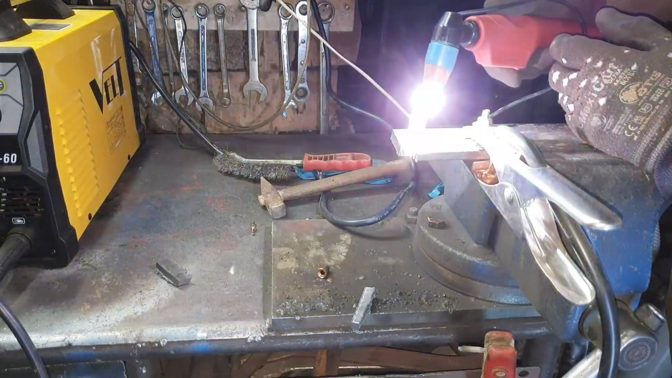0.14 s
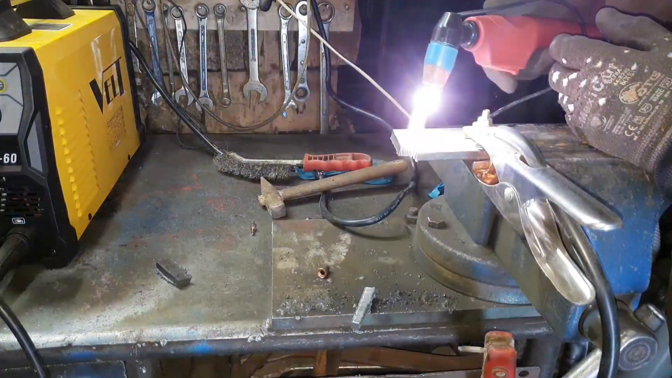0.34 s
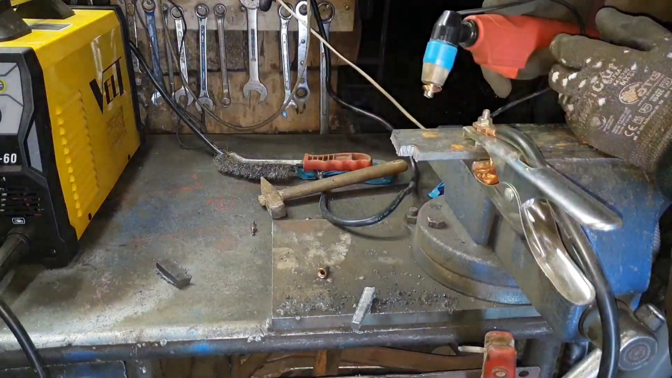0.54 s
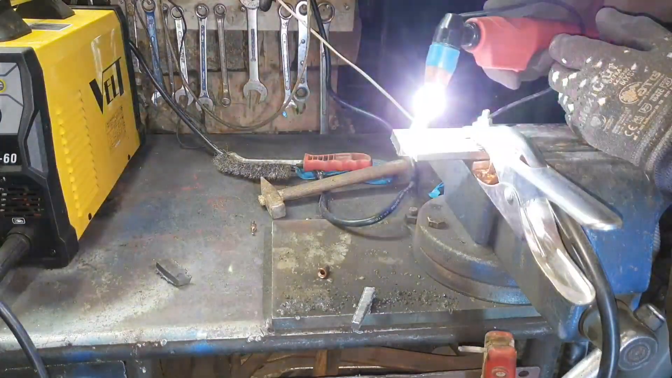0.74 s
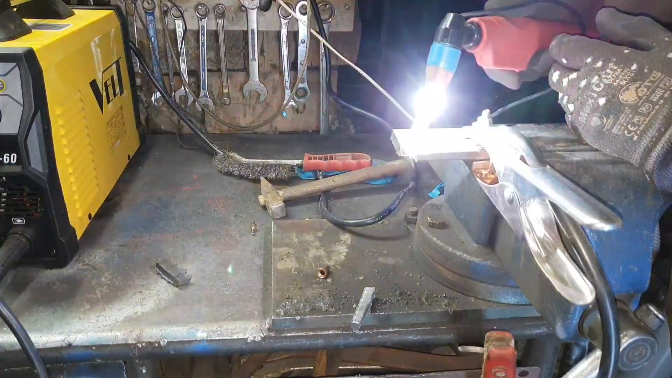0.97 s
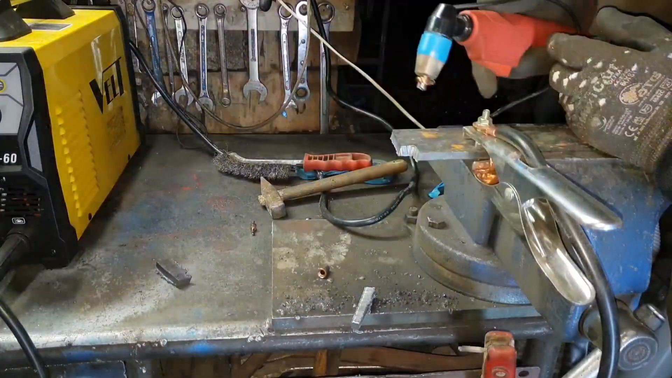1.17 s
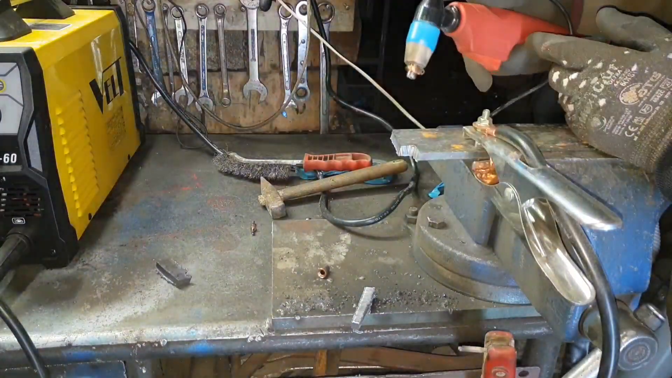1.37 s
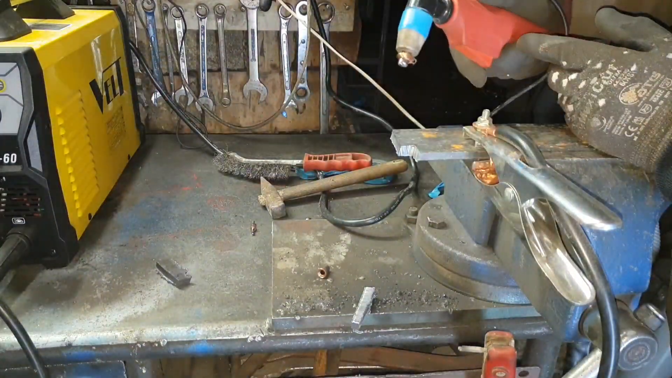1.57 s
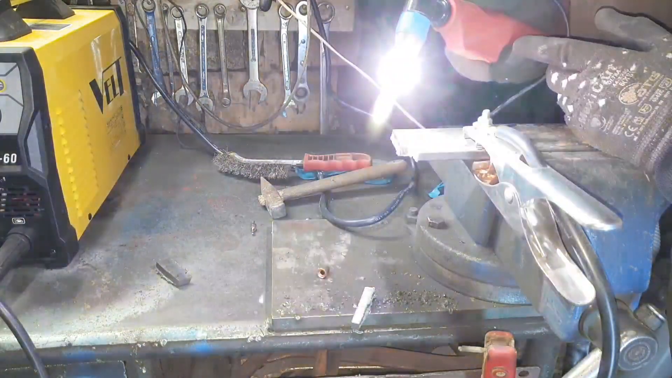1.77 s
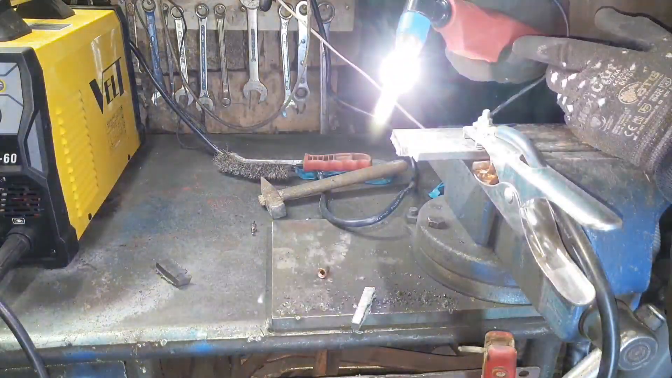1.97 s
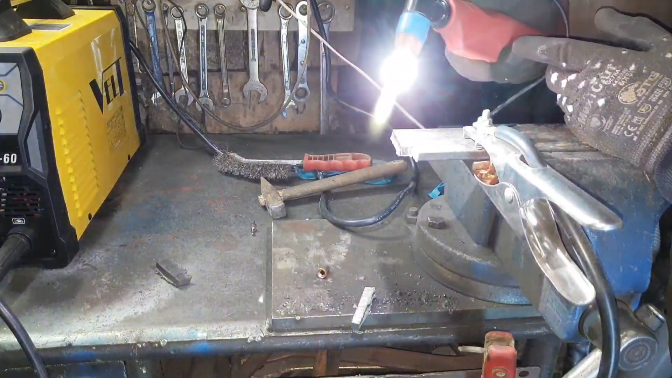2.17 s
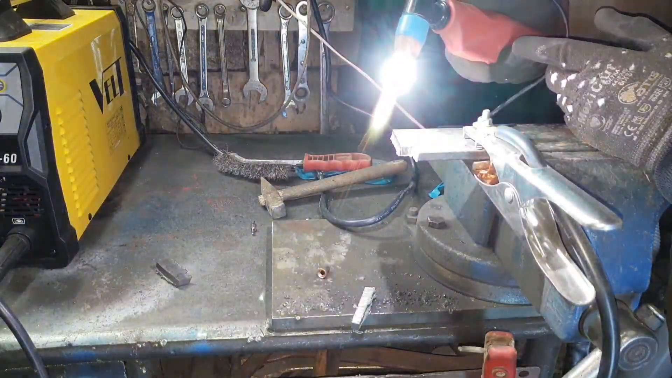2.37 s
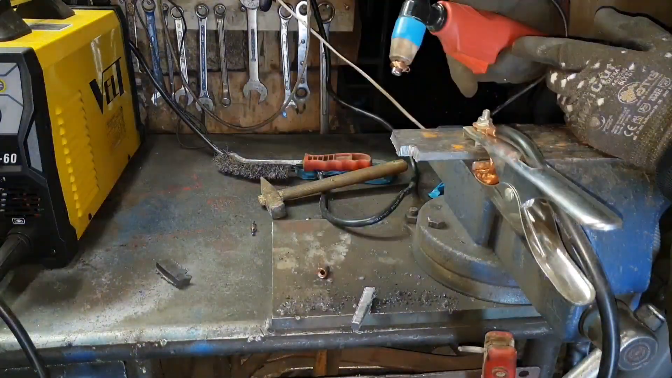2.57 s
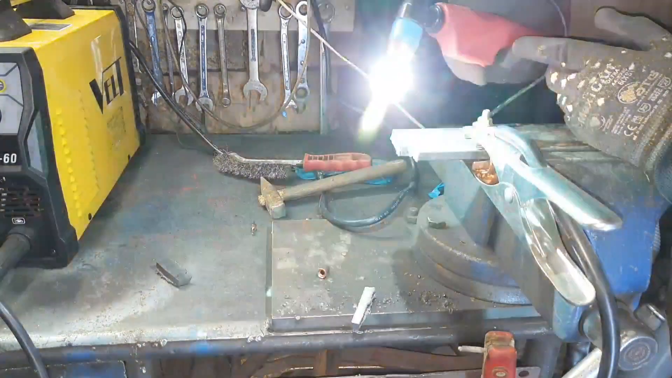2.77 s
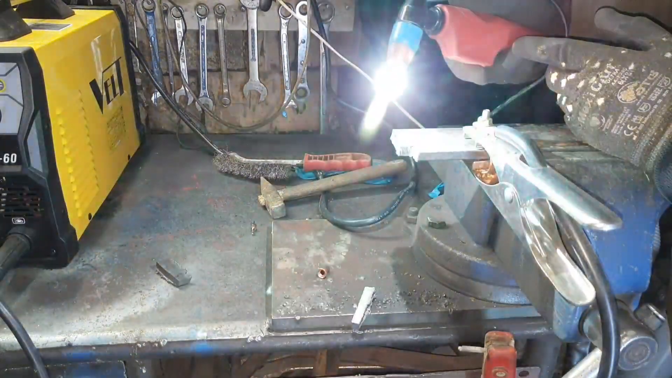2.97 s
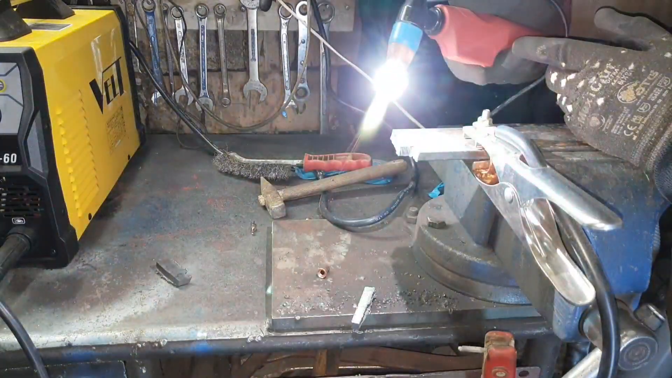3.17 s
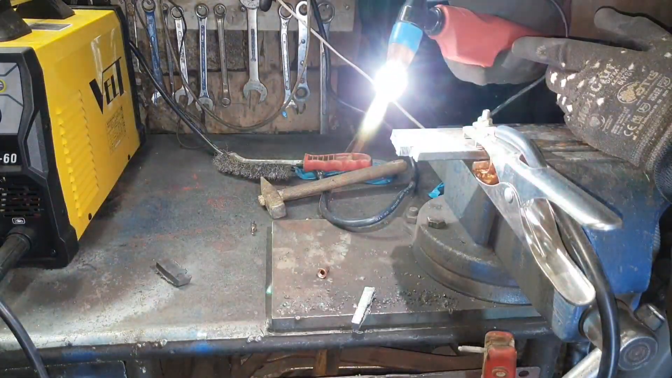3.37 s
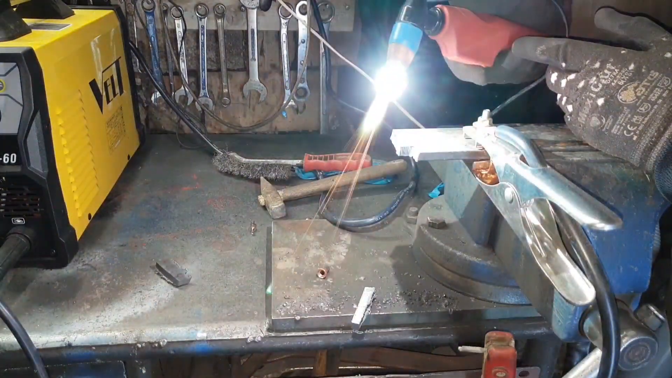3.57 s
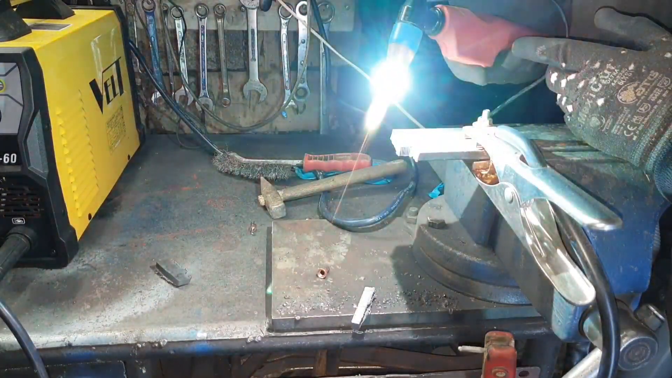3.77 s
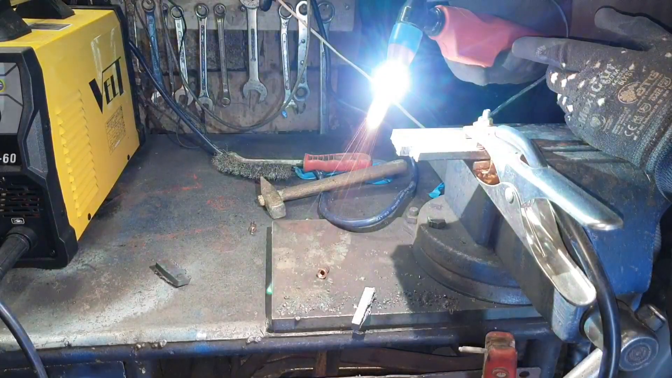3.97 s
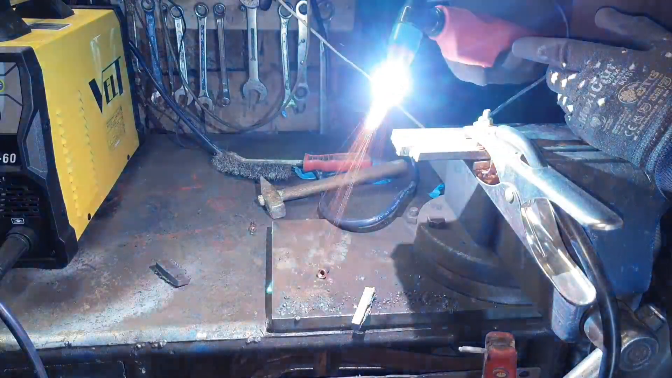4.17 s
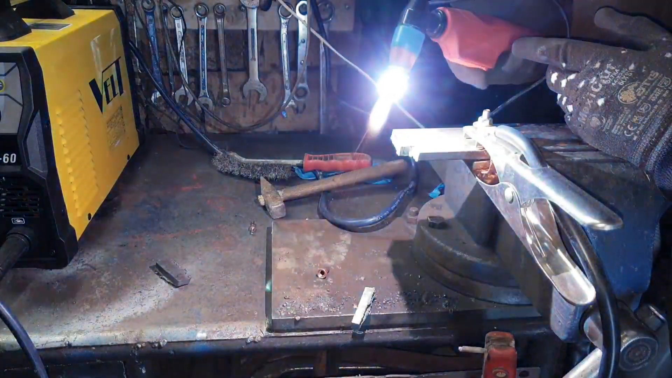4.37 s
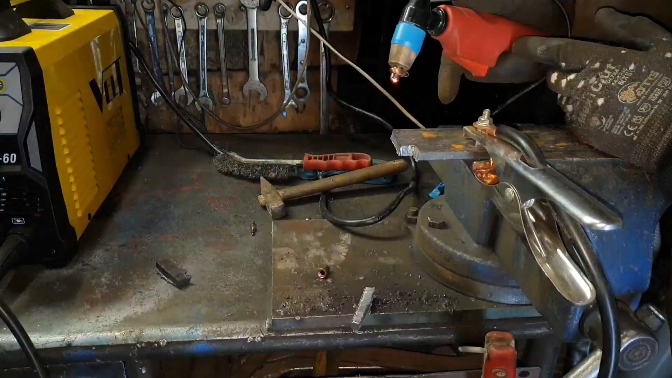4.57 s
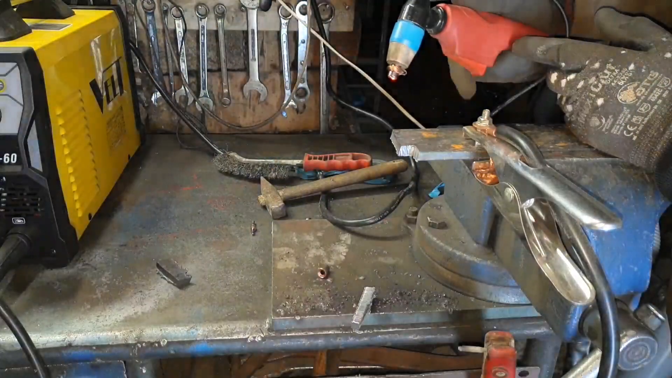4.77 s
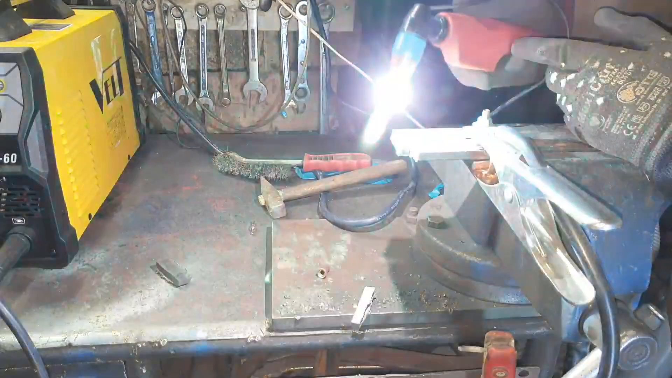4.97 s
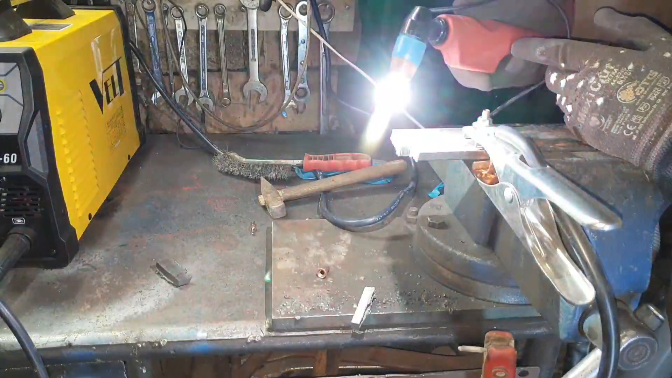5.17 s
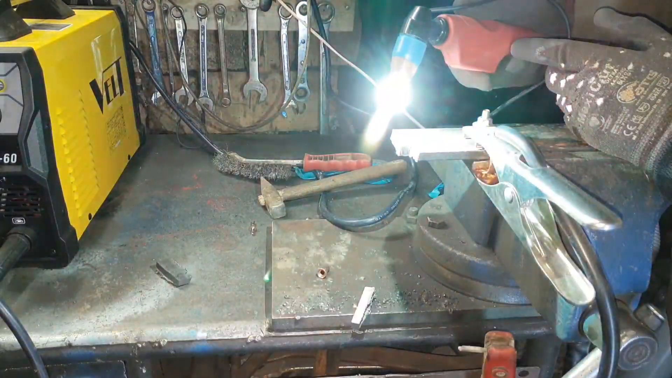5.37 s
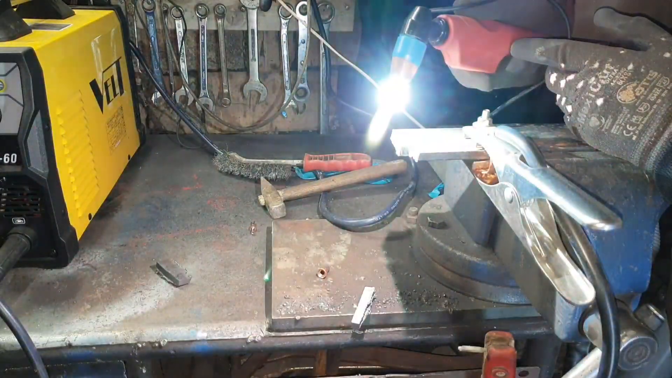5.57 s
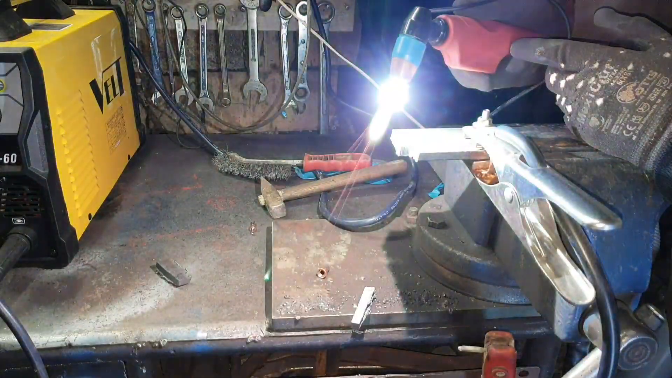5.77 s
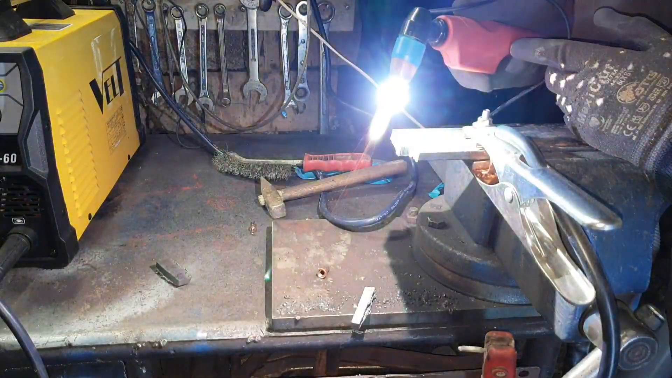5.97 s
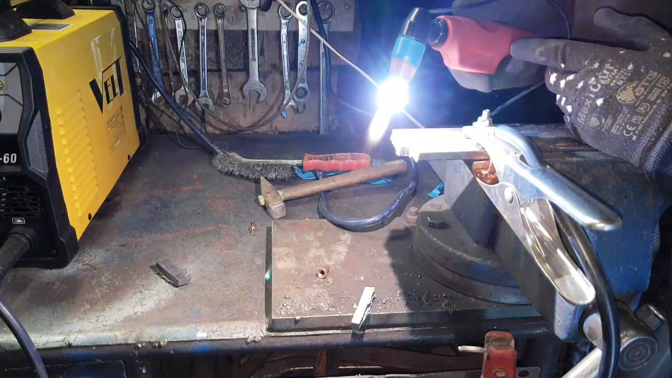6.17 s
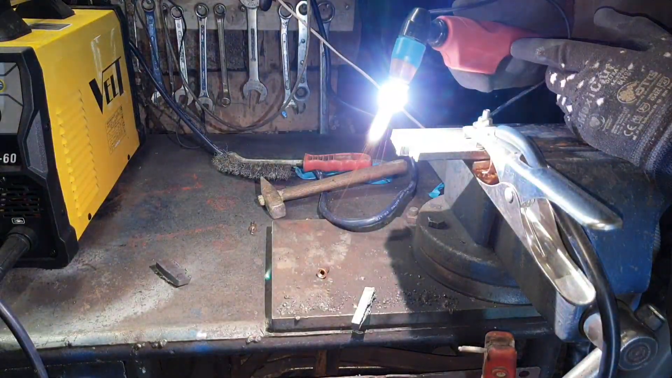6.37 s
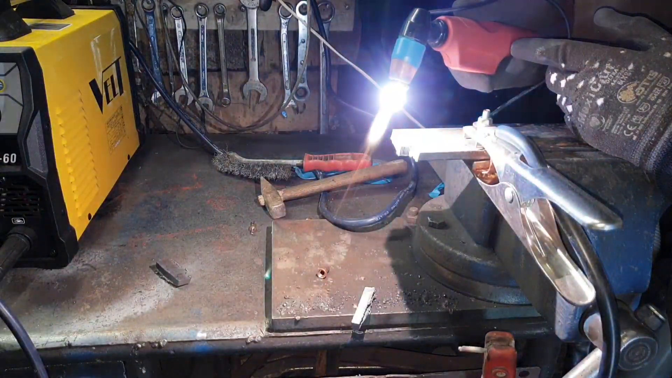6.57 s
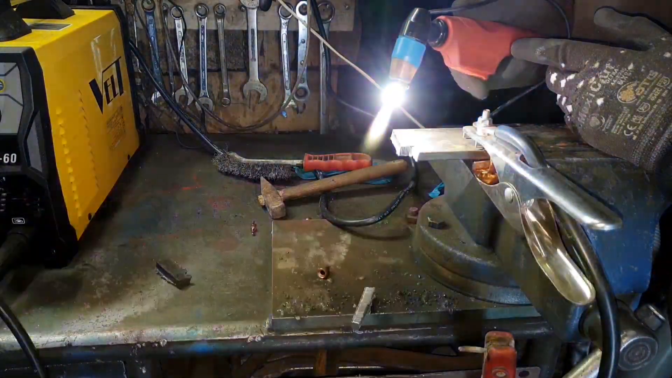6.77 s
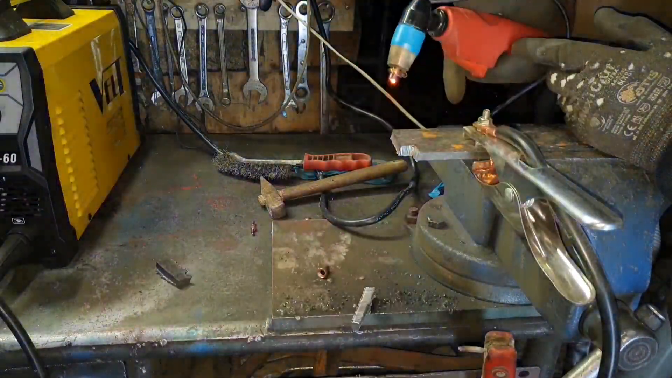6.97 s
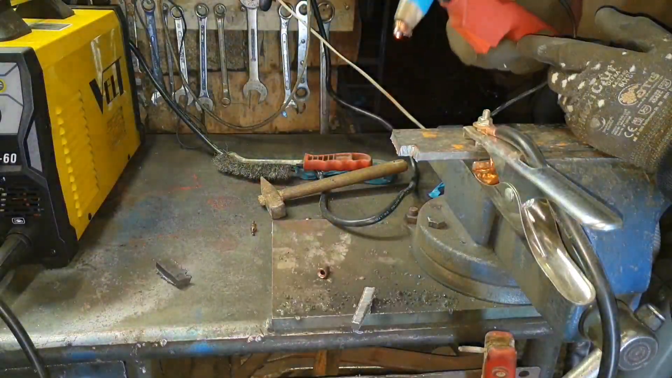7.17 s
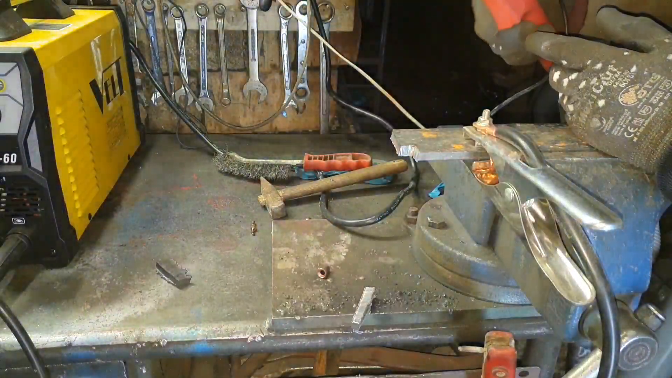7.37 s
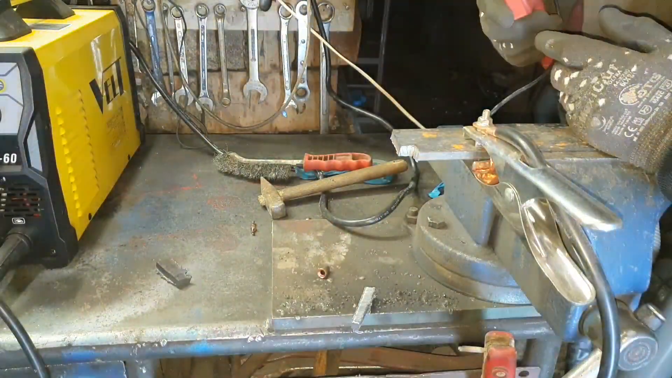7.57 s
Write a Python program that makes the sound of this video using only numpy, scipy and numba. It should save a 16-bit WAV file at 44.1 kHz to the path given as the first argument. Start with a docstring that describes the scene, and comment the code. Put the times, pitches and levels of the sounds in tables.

```python
"""Plasma torch over a steel bench

A plasma torch burns five times in the air and misfires once, an arm's length from a phone.
Compressed air hisses from the nozzle throughout; the arc strikes with a bang, roars, howls and sizzles
over the hiss, and dies with a sucking pop. Vice and plate ring along with it. Bench, vice and tool wall
throw close echoes, and the power source's fan hums underneath."""
import sys
import numpy as np
from scipy import signal
from scipy.fft import rfft, irfft, next_fast_len
from scipy.io import wavfile
from scipy.ndimage import uniform_filter1d, map_coordinates
from numba import njit

SR = 44100
rng = np.random.default_rng(int(sys.argv[2]) if len(sys.argv) > 2 else 0)


def unload_audio(sound):
    """Save the sound as a 16-bit wav file, at the path given as the first command line argument."""
    columns = np.transpose(np.atleast_2d(sound))
    # keep every value between -1 and 1, then stretch to whole-number steps
    steps = np.round(np.clip(columns, -1, 1) * 32767)
    wavfile.write(sys.argv[1], SR, steps.astype(np.int16))


N = 336483
TIME = np.arange(N) / SR
LEAD = 40  # samples a transient starts ahead of its cue
TRANSIENT_MS = np.arange(-LEAD, 1200) * 1000 / SR
TOP_SPLIT_HZ = 10200  # where the bright half of hiss and sizzle begins


def undb(db):
    """Decibels to gain."""
    return 10 ** (np.asarray(db) / 20)


def unit(x):
    """Each channel scaled to rms 1."""
    return x / np.sqrt(np.mean(x ** 2, axis=-1, keepdims=True))


def noise(colour, lo_hz, hi_hz, wide):
    """Stereo noise of rms 1, band edges faded over half an octave; wide is side over mid."""
    size = next_fast_len(N)
    octave = np.log2(np.arange(1, size // 2 + 2) * SR / size)
    hz, db = np.transpose(colour)
    low_cut = np.clip(2 * (octave - np.log2(lo_hz)) + .5, 0, 1)
    high_cut = np.clip(2 * (np.log2(hi_hz) - octave) + .5, 0, 1)
    gain = undb(np.interp(octave, np.log2(hz), db)) * np.sqrt(low_cut * high_cut)
    mid, side = irfft(rfft(rng.standard_normal((2, size))) * gain, size)[:, :N]
    return unit(np.array([mid + wide * side, mid - wide * side]))


@njit
def swept_band(x, hz, width_hz):
    """State-variable band-pass with moving centre and width, gain 1 at the centre."""
    y, band_state, low_state = np.empty(len(x)), 0., 0.
    for i in range(len(x)):
        g, damping = np.tan(np.pi * hz[i] / SR), width_hz[i] / hz[i]
        band = (band_state + g * (x[i] - low_state)) / (1 + g * (g + damping))
        band_state, low_state = 2 * band - band_state, low_state + 2 * g * band
        y[i] = damping * band
    return y


def steady_band(x, hz, width_hz):
    """The band-pass held at one pitch."""
    return swept_band(x, np.full(N, float(hz)), np.full(N, float(width_hz)))


def brighten(x, db, split_hz):
    """High shelf whose gain rides a dB curve."""
    upper = signal.sosfiltfilt(signal.butter(4, split_hz, "high", fs=SR, output="sos"), x)
    return x + (undb(db) - 1) * upper


def drift(rate_hz):
    """Smooth random modulator with a spread near 1."""
    hold = int(SR / rate_hz)
    steps = np.repeat(rng.standard_normal(N // hold + 1), hold)
    return 1.07 * uniform_filter1d(uniform_filter1d(steps, hold), hold)[:N]


def pulse(at_ms, width_ms):
    """A bell-shaped pressure pulse."""
    return np.exp(-.5 * ((TRANSIENT_MS - at_ms) / width_ms) ** 2)


def burn_times():
    """Starts and ends [s]: the first burn is already alight, the rest catch from their last strike."""
    catches = [-1] + [s + CATCH_S for s, *_ in STRIKE_CUES]
    ends = [s for s, *_ in BURN_CUES]
    starts = [max(s for s in catches if s < end) for end in ends]
    return np.array(starts), np.array(ends)


def pause_glides():
    """Seven automation curves that glide through each pause, then on to the next pause's start values."""
    starts, ends = burn_times()
    edges_s = np.column_stack([ends, np.append(starts[1:], N / SR)]).ravel()
    pairs = np.reshape(PAUSE_MIX, (len(PAUSE_MIX), -1, 2))
    return [np.interp(TIME, edges_s, pairs[:, k].ravel()) for k in range(pairs.shape[1])]


# Colour of fan wash and room tone: (frequency [Hz], relative level [dB])
FAN_COLOUR = [(30, -22), (70, -17), (130, -26), (205, -9.5), (250, -15), (298, -5.5), (372, -16), (423, -5),
              (500, -12.5), (710, -10), (950, -8.5), (1500, -9.5), (2500, -13.5)]
# Fader ride of the blade tone: (time [s], level [dB])
BLADE_RIDE = [(.5, -66), (.74, -66), (1.25, -66), (1.35, -65), (1.55, -57), (1.78, -60), (2.6, -63),
              (2.85, -71), (4.62, -61), (4.8, -56.5), (4.97, -63), (6.97, -57), (7.2, -59), (7.28, -63),
              (7.46, -65), (7.63, -64)]
def fan(blade_hz=719.8):
    """The power source's fan lays a bed of air wash under a wavering blade tone."""
    wash_db = pause_glides()[-1] + 1.9 * drift(3)
    wash = undb(wash_db) * noise(FAN_COLOUR, 20, 2900, wide=0.6)
    phase = 2 * np.pi * np.cumsum(blade_hz * (1 + 0.001 * drift(6.3))) / SR
    blade_db = np.interp(TIME, *np.transpose(BLADE_RIDE)) + 1.8 * drift(25) + 2 * drift(6)
    return wash + np.sqrt(2) * undb(blade_db) * np.sin(phase)


# Slaps off bench, vice and tool wall: (delay [ms], left level [dB], right level [dB])
EARLY_ECHOES = [(.36, -36, -20), (1.1, -33, -38), (2.25, -25, -31), (4.22, -24.5, -14), (5.55, -19, -25.5),
                (6.5, -46, -27), (7.4, -24, -46), (10.5, -51, -30), (12.1, -35, -19)]
def workshop(x, tail_db=-10, t60_s=0.22, tail_top_hz=10700, left_lean_db=1.4):
    """Direct sound, close echoes and a short dull tail that shifts as the hand moves the torch."""
    ms = np.arange(int(SR / 4)) * 1000 / SR
    taps, wait, right_lag = 600, 8, 0.5  # samples; the wait leaves room for the half-sample lag
    delays = np.array([[wait], [wait + right_lag]])
    near = irfft(np.exp(-2j * np.pi * np.arange(taps // 2 + 1) / taps * delays), taps)
    for delay_ms, *db in EARLY_ECHOES:
        samples_away = abs(np.arange(taps) - wait - delay_ms * SR / 1000)
        near += undb(db)[:, None] * np.maximum(1 - samples_away / 1.5, 0)
    damping = signal.butter(1, tail_top_hz, fs=SR, output="sos")
    tails = signal.sosfilt(damping, rng.standard_normal((2, 2, len(ms))))
    envelope = undb(-60 * ms / 1000 / t60_s) * np.clip(ms / 8, 0, 1)
    tails = unit(tails * envelope) / np.sqrt(len(ms))
    turn = .8 * drift(2)
    blend = np.cos(turn), np.sin(turn)  # equal-power crossfade between two torch positions
    far = sum(signal.oaconvolve(gain * x, tail, axes=1)[:, :N] for gain, tail in zip(blend, tails))
    room = signal.oaconvolve(x, near, axes=1)[:, :N] + undb(tail_db) * far
    return room * undb([[left_lean_db / 2], [-left_lean_db / 2]])


# Colours of the jet's top hiss and lower hiss: (frequency [Hz], relative level [dB])
TOP_HISS_COLOUR = [(7000, -6.5), (8300, -15), (10200, -5), (12300, 1.5), (13600, 0), (14600, 4.5),
                   (16500, -1)]
LOWER_HISS_COLOUR = [(880, -20), (1500, -24), (1870, -18), (2400, -11), (2970, -6.5), (4050, -1),
                     (6890, -4), (8600, -11.5), (10000, -19), (13000, -33), (22000, -120)]
# Mix for the pause after each burn, every entry a start and an end column: (jet level [dB],
# top shelf [dB], lower hiss [dB], swish centre [Hz], swish width [Hz], swish [dB], fan wash [dB])
PAUSE_MIX = [(-36.5, -33.5, 0, 0, -2.5, -3, 2960, 2500, 1700, 370, -12.5, -5, -50, -49.5),
             (-35, -32, 0, 2.5, -7.5, -8, 4700, 5100, 650, 660, -32, -29, -50.5, -52.5),
             (-34, -33, -0.5, 3, -9.5, -8.5, 6000, 5500, 860, 810, -17, -16, -56, -51),
             (-30.5, -31.5, 1, 2, -8.5, -8, 4300, 4900, 550, 580, -32, -22, -51, -52.5),
             (-30.5, -31.5, 2, 1.5, -7.5, -7, 6800, 6600, 580, 870, -34, -6, -51, -51)]
def air_jet(glance_ms=.42, sway_ms=.035, glance_db=-16):
    """Cold compressed air: two bands of hiss and a swish that moves as the nozzle passes the plate."""
    level_db, shelf_db, lower_db, swish_hz, width_hz, swish_db = pause_glides()[:-1]
    top = undb(0.53 * drift(36)) * noise(TOP_HISS_COLOUR, 5900, SR, wide=0.5)
    top = brighten(top, shelf_db, TOP_SPLIT_HZ)
    lower = undb(lower_db + 2.2 * drift(9)) * noise(LOWER_HISS_COLOUR, 1000, 8100, wide=0.53)
    swish = undb(swish_db) * unit(swept_band(rng.standard_normal(N), swish_hz, width_hz))
    # the top hiss also glances off the plate, over a path that sways with the hand
    earlier = np.arange(N) - (glance_ms + sway_ms * drift(5)) * SR / 1000
    glance = undb(glance_db) * np.array([map_coordinates(ear, [earlier]) for ear in top])
    return undb(level_db + 1.1 * drift(240)) * (top + glance + lower + swish)


# Resonances of vice and plate: (pitch [Hz], width [Hz], gain [dB])
STEEL_MODES = [(946, 36, -1.5), (1430, 77, -16), (1600, 26, -3), (1827, 35, -5), (2110, 15, -16),
               (2350, 35, -7), (3060, 50, -10), (3330, 30, -7), (3570, 92, -8), (3740, 50, -8.5),
               (3955, 67, -2.5), (4240, 22, 0.5), (4434, 36, -12), (4680, 36, -9), (4970, 24, -22),
               (5340, 44, -13), (5510, 37, -3.5), (5855, 41, -4), (6132, 36, -1.5), (7130, 26, -4)]
def steel_ring(fire, waver_db=3.5, waver_hz=3.03):
    """Steel rings along with the arc; each mode swells and sinks as the flame moves over the plate."""
    drive = fire.mean(axis=0)
    return sum(undb(db + waver_db * drift(waver_hz)) * steady_band(drive, hz, width_hz)
               for hz, width_hz, db in STEEL_MODES)


def dying_pops(level_db=-3.5):
    """Each dying arc sucks air in once, with a small rebound."""
    out = np.zeros(N)
    pop = -pulse(0, 0.042) + 0.45 * pulse(0.13, 0.025) + 0.055 * pulse(0.59, 0.47)
    for s, *_ in BURN_CUES:
        out[int(s * SR) - LEAD:][:len(pop)] += undb(level_db) * pop
    return out


# Ignition hits, the fourth a misfire: (time [s], bang [dB], bang width [ms], crack [dB], thump [dB],
# nozzle ring [dB], ring pitch [Hz], ring delay [ms], ring attack [ms])
STRIKE_CUES = [(0.7435, -7.5, 0.052, -15, -29.5, -10.5, 3800, 1.5, 0.52),
               (1.7836, -6.5, 0.059, -9, -26.5, -15, 4230, 3, 0.97),
               (2.8533, -10, 0.038, -13, -29.5, -16, 5220, 22, 1.1),
               (4.9902, -10, 0.073, -24, -37, -6, 4280, 0.029, 0.23),
               (5.0169, -5.5, 0.062, -18, -33, -30, 4160, 5, .55)]
def strikes(rebound=0.5, crack_ms=.022, thump_ms=0.58):
    """A strike shoves air out behind a sharp front and springs back; a puff and a nozzle ring follow."""
    out = np.zeros(N)
    for s, bang_db, width_ms, crack_db, thump_db, ring_db, ring_hz, delay_ms, attack_ms in STRIKE_CUES:
        bang = undb(bang_db) * (pulse(0, width_ms) - rebound * pulse(3.6 * width_ms, 2.6 * width_ms))
        crack = undb(crack_db) * (pulse(0, crack_ms) - pulse(0.17, crack_ms))
        thump = undb(thump_db) * pulse(1.87, thump_ms)
        age_ms = np.maximum(TRANSIENT_MS - delay_ms, 0)
        swell = age_ms / attack_ms * np.exp(1 - age_ms / attack_ms)
        ring = undb(ring_db) * swell * np.sin(2 * np.pi * ring_hz * age_ms / 1000)
        out[int(s * SR) - LEAD:][:len(bang)] += bang + crack + thump + ring
    return out


# Colour of the arc's top end: (frequency [Hz], relative level [dB])
SIZZLE_COLOUR = [(7000, 1), (8600, -10.5), (10200, -6), (11400, -3), (12500, 2), (13500, -1), (14500, 1.5),
                 (15100, 0), (15450, -4)]
def arc_sizzle(level_db, shelf_db, notch_depth, notch_hz=13700, notch_width_hz=1300):
    """The plasma's frying top end, with a notch scooped out of it."""
    sizzle = undb(level_db + 0.5 * drift(25)) * noise(SIZZLE_COLOUR, 8600, SR, wide=0.51)
    sizzle = brighten(sizzle, shelf_db, TOP_SPLIT_HZ)
    scoop = np.array([steady_band(ear, notch_hz, notch_width_hz) for ear in sizzle])
    return sizzle - notch_depth * scoop


# Swells of the howl: (peak time [s], half length [s], boost [dB], pitch [Hz], width [Hz])
HOWL_FLARES = [(.27, 0.053, 16, 4200, 1300), (2.2, 0.27, 5.5, 4050, 260), (3.85, .2, 7, 4300, 260),
               (4.197, 0.061, 3, 4700, 900), (5.343, 0.074, 7.5, 4020, 610), (5.62, 0.1, 5.5, 4300, 300),
               (6.78, 0.074, 1.5, 4250, 700)]
def arc_howl(level_db, hz, width_hz):
    """A wandering band of turbulence; each flare lifts it and pulls it to one pitch."""
    hz = hz * (1 + 0.005 * drift(6))
    for s, half_s, boost_db, flare_hz, flare_width_hz in HOWL_FLARES:
        flare = np.exp(-((TIME - s) / half_s) ** 2)
        level_db = level_db + flare * boost_db
        hz = hz + flare * (flare_hz - hz)
        width_hz = width_hz + flare * (flare_width_hz - width_hz)
    hz = hz * (1 + 0.006 * drift(40))
    band = swept_band(rng.standard_normal(N), hz, width_hz)
    howl = unit(swept_band(band, hz, 2.5 * width_hz))
    return undb(level_db + 1.6 * drift(60)) * howl


CATCH_S, FLASH_DB, FLASH_S = 0.0035, 6.5, 0.011  # after a strike the arc catches, overshoots and settles
SPARK_DB, FIZZLE_S = -2.5, 0.012  # every strike's spark fizzles out, even on the misfire
STEADY_DB, HOWL_DB_PER_DB = -23.5, 0.93  # the howl follows the ride more steeply than the rest
# Colour of roar and body: (frequency [Hz], relative level [dB])
ARC_COLOUR = [(18, -78), (30, -46), (503, -17), (627, -14.5), (691, -12.5), (821, -11.5), (951, -12.5),
              (1020, -10.5), (1510, -10), (3320, -5), (4140, -3.5), (7270, -3.5), (8420, -12.5),
              (10500, -5), (13600, -41), (22000, -120)]
# Fader ride of the arc as the hand turns the torch: (time [s], level [dB])
ARC_RIDE = [(0, -26), (.12, -23), (.45, -24), (.78, -26), (1.16, -25), (1.82, -23.5), (2.2, -23),
            (2.52, -23.5), (2.88, -26.5), (2.93, -26.5), (3.15, -27), (3.95, -27.5), (4.2, -24),
            (4.52, -22), (5.05, -25.5), (5.38, -24), (5.5, -26.5), (6.0, -25.5), (6.19, -25), (6.3, -23),
            (6.6, -22), (6.8, -21.5), (6.88, -22)]
# Voicing of each burn, levels relative to the ride: (end time [s], roar [dB], body shelf [dB],
# sizzle [dB], sizzle shelf [dB], notch depth [0-1], howl pitch [Hz], howl width [Hz], howl [dB])
BURN_CUES = [(0.4638, -10.5, 0, 0, -0.5, .1, 4250, 900, -24),
             (1.1737, -9.5, -.6, -1, 1.5, .15, 3670, 800, -11.5),
             (2.537, -11, -1.7, 3, 0.5, 0.1, 4120, 280, -6.5),
             (4.5327, -10, 1.5, 2.5, 1.5, 0.8, 4430, 800, -5.5),
             (6.8944, -9.5, 0.7, 4.5, -1.5, 0.4, 4640, 1500, -4.5)]
def arc(body_split_hz=6100, attack_s=0.0018, dim_s=.011):
    """Turbulent plasma: low roar, body, howl and sizzle, all fluttering with the arc root."""
    starts, ends = burn_times()
    burn = np.clip(np.searchsorted(starts, TIME + .01) - 1, 0, None)  # switch voicing 10 ms early
    age_s, remaining_s = TIME - starts[burn], ends[burn] - TIME
    voicing = np.transpose(BURN_CUES)[1:, burn]
    roar_db, body_shelf_db, sizzle_db, sizzle_shelf_db, notch, howl_hz, width_hz, howl_db = voicing
    ride_db = np.interp(TIME, *np.transpose(ARC_RIDE))
    flash_db = FLASH_DB * np.exp(-abs(age_s) / FLASH_S)
    gate = np.clip(age_s / attack_s + 0.32, 0, 1) * np.clip(remaining_s / dim_s, 0, 1)
    sparks = sum((TIME > s) * np.exp(-abs(TIME - s) / FIZZLE_S) for s, *_ in STRIKE_CUES)
    envelope = np.maximum(gate, undb(SPARK_DB) * sparks) * undb(ride_db + flash_db)
    roar = undb(roar_db + 1.23 * drift(15)) * noise(ARC_COLOUR, 20, 2290, wide=0.078)
    body = undb(0.9 * drift(24.97)) * noise(ARC_COLOUR, 2295, 8060, wide=0.48)
    body = brighten(body, body_shelf_db, body_split_hz)
    howl = arc_howl(howl_db + HOWL_DB_PER_DB * (ride_db - STEADY_DB), howl_hz, width_hz)
    sizzle = arc_sizzle(sizzle_db, sizzle_shelf_db, notch)
    flutter = undb(.3 * drift(12) + 0.87 * drift(350))
    return envelope * flutter * (roar + body + howl + sizzle)


def scene():
    """Torch and ringing steel play through the workshop, over the fan bed."""
    fire = arc() + strikes() + dying_pops()
    return workshop(fire + steel_ring(fire) + air_jet()) + fan()


LOW_CUT_HZ, HIGH_CUT_HZ = 65, 15480
BASS_HZ, BASS_LEAN_DB = 300, 4
def record(dry):
    """The phone drops the deepest bass and cuts the top; its left port takes more bass than its right."""
    thin = signal.sosfilt(signal.butter(2, LOW_CUT_HZ, "high", fs=SR, output="sos"), dry)
    bass = signal.sosfilt(signal.butter(1, BASS_HZ, fs=SR, output="sos"), thin)
    leaning = thin + (undb([[BASS_LEAN_DB / 2], [-BASS_LEAN_DB / 2]]) - 1) * bass
    return signal.sosfilt(signal.ellip(12, .2, 60, HIGH_CUT_HZ, fs=SR, output="sos"), leaning)


dry = scene()
out = record(dry)
unload_audio(out)
```